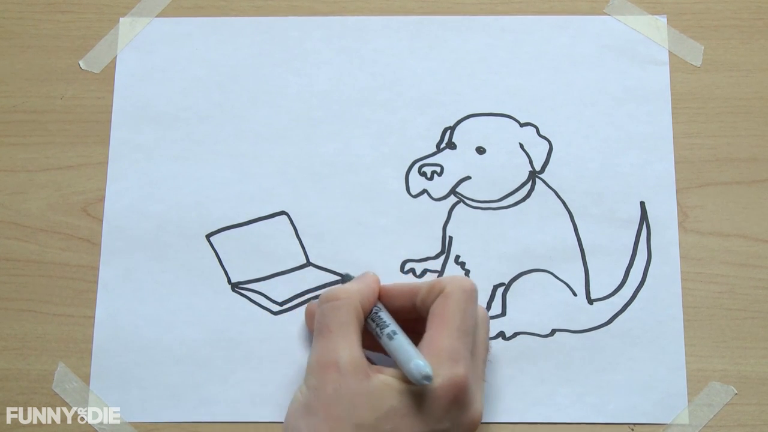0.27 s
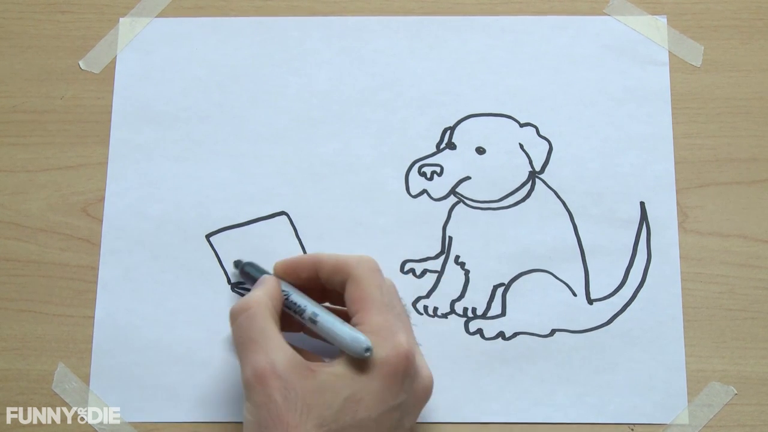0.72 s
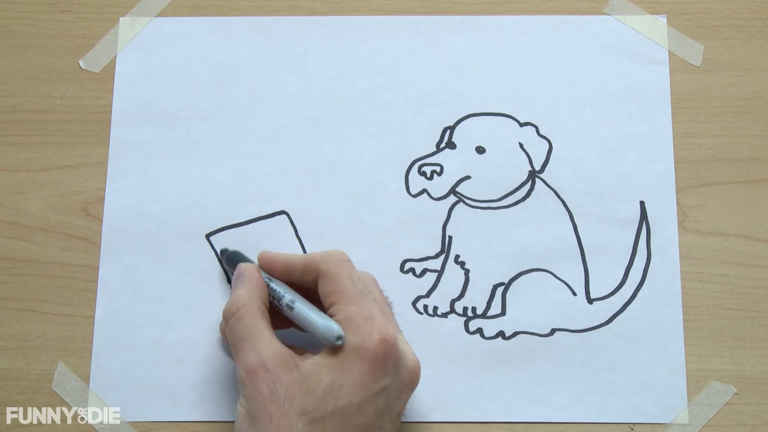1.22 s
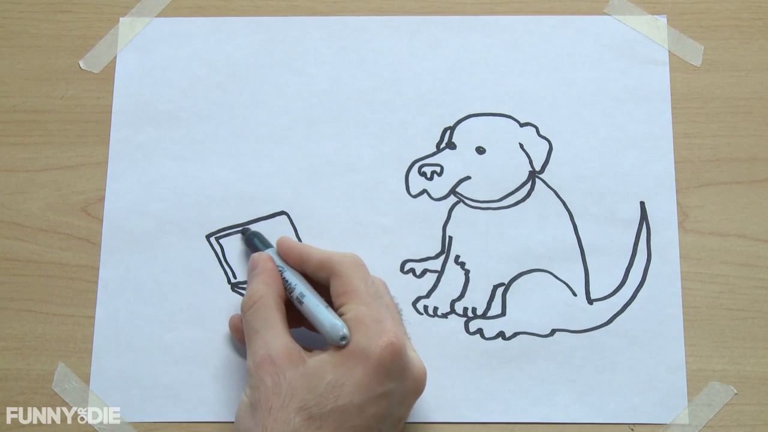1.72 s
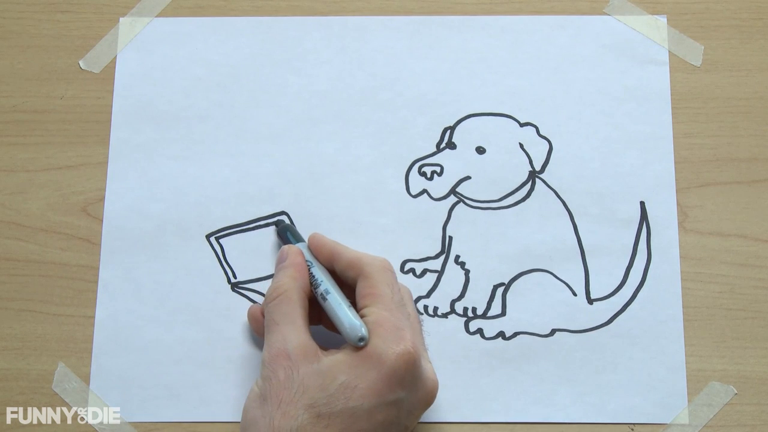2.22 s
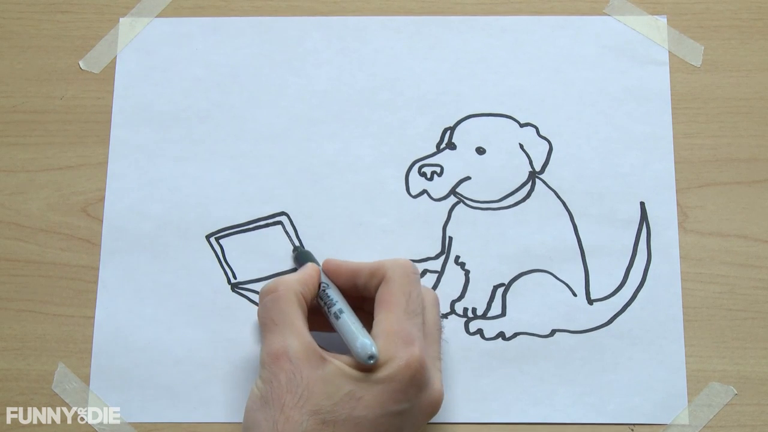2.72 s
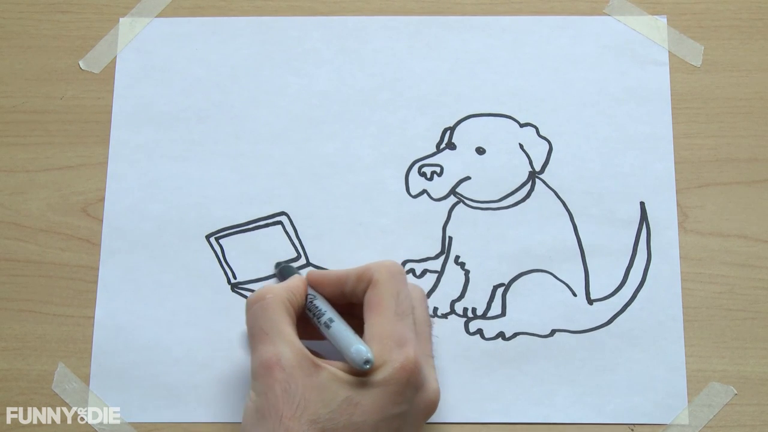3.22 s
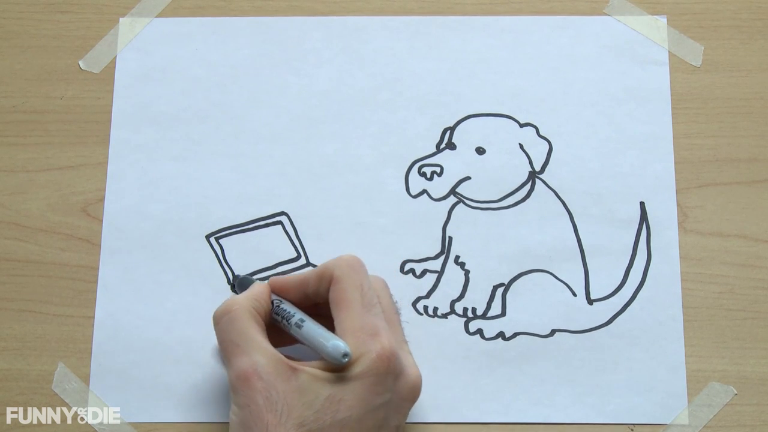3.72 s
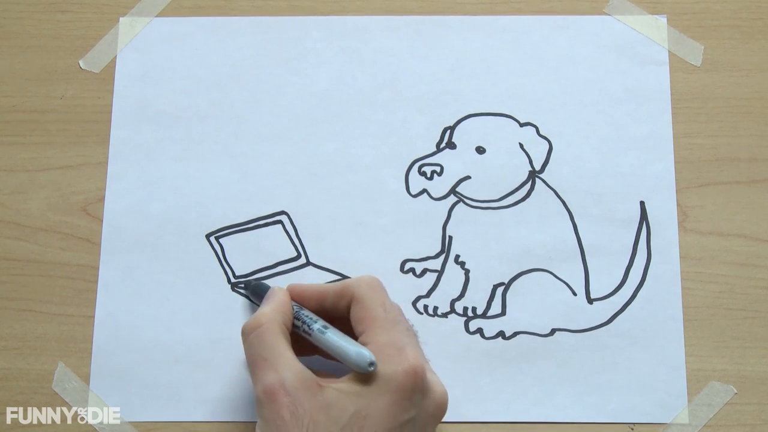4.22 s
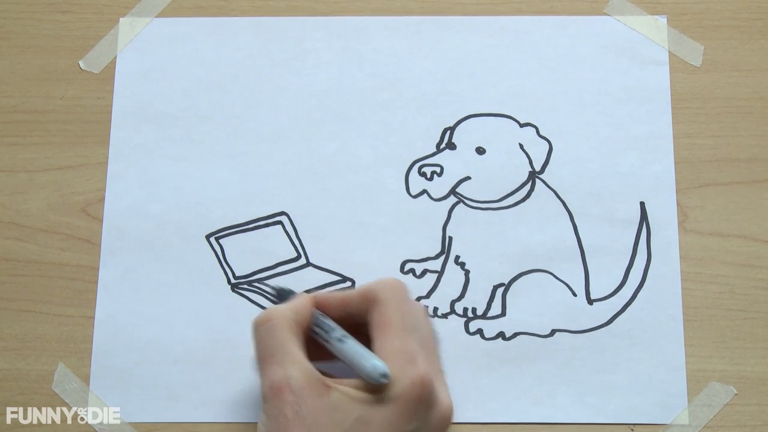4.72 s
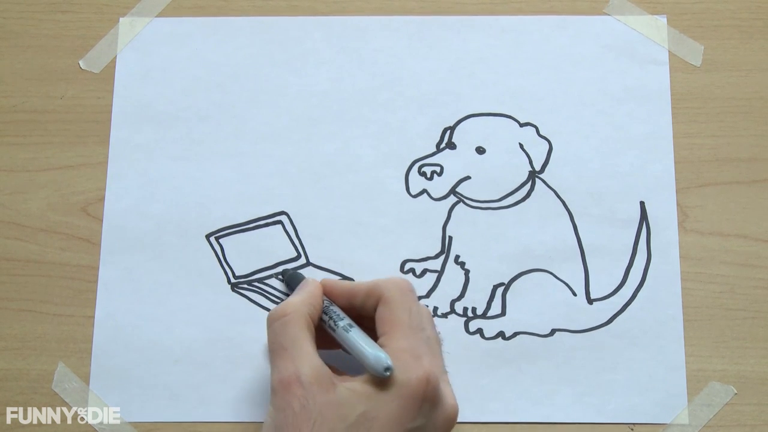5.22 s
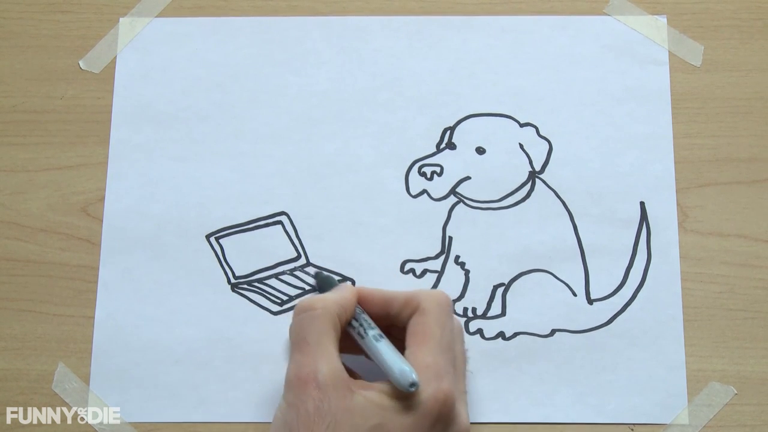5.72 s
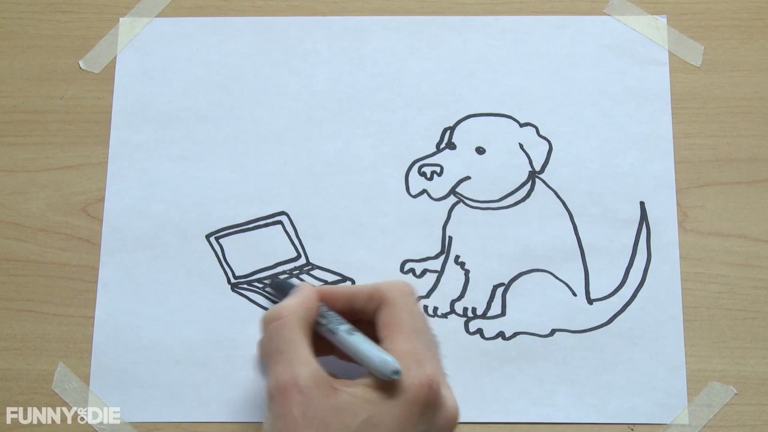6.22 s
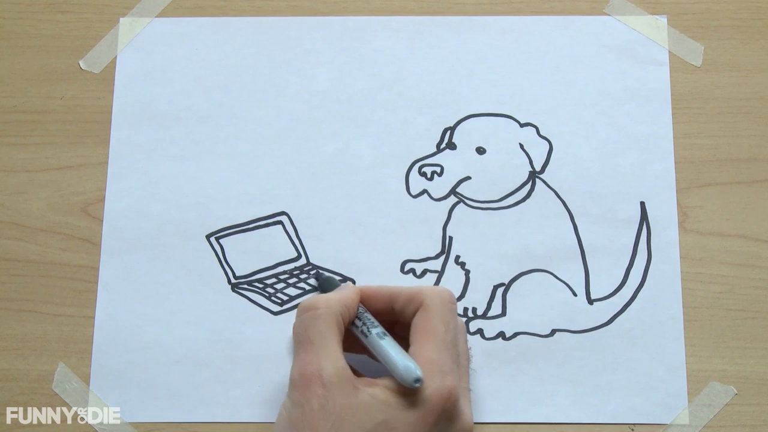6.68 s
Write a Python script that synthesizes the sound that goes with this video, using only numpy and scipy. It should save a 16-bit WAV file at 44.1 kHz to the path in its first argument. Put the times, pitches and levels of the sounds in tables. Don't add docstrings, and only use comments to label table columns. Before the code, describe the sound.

Close, bright marker strokes hiss across paper in a quiet room, pausing, ticking and softly knocking the tabletop, ending in harder swipes.

```python
import sys
import numpy as np
from scipy import signal
from scipy.fft import rfft, irfft, next_fast_len
from scipy.io import wavfile

SR = 44100
rng = np.random.default_rng(int(sys.argv[2]) if len(sys.argv) > 2 else 0)


def master_out(mix):
    frames = np.transpose(np.atleast_2d(mix))
    ceiling = np.clip(frames, -1, 1)
    pcm = np.round(ceiling * 32767).astype(np.int16)
    wavfile.write(sys.argv[1], SR, pcm)


def how_loud(loudness_db):
    steps = np.asarray(loudness_db, float) / 20
    return 10 ** steps


N = 306495
PADDED = next_fast_len(N)
TIME = np.arange(N) / SR
FREQ = np.maximum(np.arange(PADDED // 2 + 1) * SR / PADDED, 1)


def marker():
    # start, landing and hold in seconds, barrel level in dB, the same at the end of the hold.
    hatch = [
        (0.0, 0.0017, 0.054, -56.5, -56),
        (.085, .03, 0.036, -56, -56),
        (.18, 0.028, 0.031, -53.5, -57),
        (.275, .02, .015, -60, -65),
    ]
    down = [
        (1.128, .011, .158, -49, -49.5),
        (1.345, 0.043, 0.066, -52.5, -60),
    ]
    up = [
        (1.635, 0.0056, 0.12, -45.5, -54),
        (1.76, 0.056, 0.053, -52.5, -53.5),
        (1.896, .05, 0.029, -50.5, -53.5),
        (2.02, 0.011, 0.033, -54, -51.5),
        (2.14, .016, .012, -51.5, -58),
        (2.383, 0.02, .008, -61, -60),
    ]
    slow_slant = [
        (2.47, .12, 0.082, -56, -61),
        (2.66, 0.064, 0.027, -57, -60.5),
        (2.78, 0.044, .03, -62, -65),
        (2.87, 0.031, .016, -71, -73),
        (5.86, .1, .014, -69, -69),
    ]
    long_across = [
        (3.05, 0.06, 0.19, -52.5, -46),
    ]
    across = [
        (3.325, 0.055, 0.08, -48, -61),
        (3.41, 0.095, 0.11, -49, -57),
        (3.645, 0.048, 0.073, -53, -58.5),
        (3.93, .005, .12, -65, -73),
    ]
    slant = [
        (4.32, .05, 0.089, -51, -57),
        (4.743, 0.019, 0.076, -51.5, -54),
        (5.035, .019, 0.065, -54, -52.5),
        (5.321, 0.013, 0.071, -51.5, -53),
        (5.59, 0.021, 0.07, -56, -51.5),
    ]
    swipe = [
        (6.064, 0.0054, 0.11, -40.5, -43),
        (6.46, .016, .017, -71, -72),
        (6.497, 0.012, 0.074, -40.5, -39),
        (6.873, 0.02, 0.044, -36.5, -42),
    ]
    # frequency in Hz, level in dB per Hz.
    down_colour, up_colour = [(1500, -11), (2100, -14), (2700, -18), (3650, -11), (7300, -10), (8460, -9.5),
                              (11500, -12), (14400, -4), (15500, -8)], [(1290, -47), (2200, -25), (2700, -18), (4230, -14.5),
                                                   (7480, -13.5), (8530, -3.5), (10600, -7), (11600, -5.5),
                                                   (15500, -6)]
    across_colour, slant_colour = [(1500, -40), (2300, -16), (4500, -13.5), (7200, -12.5), (7600, -4),
                                   (10300, -4.5), (13800, 1), (14800, -10), (15500, -16)], [(1290, -27), (2200, 0.5), (2410, -7.5),
                                                          (3360, -2.5), (4940, 0), (7360, 1), (9960, -4),
                                                          (11200, -2.5), (13700, 9.5), (15500, -1)]
    swipe_colour = [(1290, -51), (2200, -25.5), (4400, -21.5), (4820, -16), (6620, -18), (8120, -7),
                    (10400, -1.5), (11300, -5.5), (13000, -3), (15500, -16)]
    # frequency in Hz, width in Hz, level in dB.
    down_modes, up_modes = [(4730, 170, -8), (6640, 300, 4), (8100, 230, 1.5), (8660, 240, 10),
                            (10240, 680, 0), (12700, 400, 5), (14600, 400, -2)], [(8220, 71, -3), (9180, 85, 3), (10100, 38, -6),
                                                (10100, 170, -13), (10500, 64, -14), (11400, 210, 3),
                                                (14100, 83, -9)]
    across_modes, slant_modes = [(5380, 910, -7.5), (7620, 220, 5), (8290, 1700, -4.5), (8600, 61, -3),
                                 (9540, 150, -8), (9900, 200, 5.5), (10370, 450, 3.5), (11000, 150, -4),
                                 (11000, 180, -6), (11750, 220, 2), (13300, 290, -15)], [(4950, 270, -0.5), (6200, 240, -22), (8030, 210, 1),
                                                       (9900, 870, 11.5), (12700, 400, 1), (12900, 370, -2)]
    swipe_modes = [(4900, 190, -18), (8180, 160, 5), (8800, 150, -6), (10130, 180, 4), (10650, 230, -5),
                   (11600, 150, -9), (11800, 180, -6), (12800, 270, 4)]
    # lift-off in dB per s, arch in dB per s of hold, paper in dB, paper leads in dB per dB (negative: it
    # lags), paper lingers 0-1, tip in dB, tip brightens by dB. The last number of a pull lifts the modes in dB.
    pulls = [
        (down, (250, 11, -4, 0.1, 0.2, -7.5, 0.1), down_colour, down_modes, 4),
        (up, (500, 15, -8, -0.14, 0.12, -2, -6), up_colour, up_modes, 5),
        (across, (350, 1, -8.5, 0.2, 0.4, -8, 4.5), across_colour, across_modes, 5),
        (hatch, (400, 10, -8, -0.06, 0.38, -6, 2), across_colour, across_modes, 5),
        (long_across, (350, 6, -10.5, 0.66, 0.3, -19, 11), across_colour, across_modes, 5),
        (slow_slant, (500, 6, -4.5, 0.08, 0.31, -6, -3), slant_colour, slant_modes, 3),
        (slant, (600, 32, -4.5, 0, 0.47, -1.5, 0), slant_colour, slant_modes, 3),
        (swipe, (552, 43, -11.5, 0.1, 0.87, -6, 3.5), swipe_colour, swipe_modes, 4),
    ]
    rub = rfft(slips(per_s=9000, spread_db=-0.5, smooth=1.0), PADDED)
    flutter_db = 0.94 * drift(7.5) + 0.4 * drift(150)
    direct = sum(strokes(*pull, rub) for pull in pulls) * how_loud(flutter_db) + ticks()
    echoes = dying_noise(level_db=-38.5, t60=0.41, start_s=0.02)
    walls = signal.lfilter(*signal.butter(2, 6500, fs=SR), echoes)
    return direct + signal.fftconvolve(direct, walls)[:N]


def strokes(rows, touch, points, modes, lift_db, rub):
    paper_gives, mean_db = 0.29, -53.5
    heard = rub * colour(points, modes, lift_db)
    paper = band(heard, 1500, 6730)
    barrel = band(heard, 7250, 11150)
    tip = band(heard, 11320, 17500)
    lift_db_per_s, arch_db_per_s, paper_db, leads, lingers, tip_db, brightens_db = touch
    out = np.zeros(N)
    for start_s, *shape in rows:
        first = round(start_s * SR)
        barrel_db = pressure(*shape, lift_db_per_s, arch_db_per_s)[:N - first]
        length = len(barrel_db)
        span = slice(first, first + length)
        peak_db, so_far_db = barrel_db.max(), np.maximum.accumulate(barrel_db)
        let_go_db = np.minimum(so_far_db - barrel_db, 18)
        landing_db = np.minimum(peak_db - so_far_db, 12)
        on_paper_db = paper_db + lingers * let_go_db + leads * landing_db - paper_gives * (peak_db - mean_db)
        on_tip_db = tip_db + brightens_db * np.minimum(np.linspace(0, 2, length), 1)
        stroke = barrel[span] + how_loud(on_paper_db) * paper[span] + how_loud(on_tip_db) * tip[span]
        stroke *= signal.windows.tukey(length, 200 / length) * how_loud(barrel_db)
        sheet = dying_noise(level_db=-27, t60=0.045, start_s=0.0012)[:2500]
        sheet[0] = 1
        sheet_sound = signal.fftconvolve(stroke, sheet / np.sqrt(np.sum(sheet ** 2)))
        out[first:][:len(sheet_sound)] += sheet_sound[:N - first]
    return out


def pressure(attack_s, hold_s, db, end_db, lift_db_per_s, arch_db_per_s):
    landing_db, lifted_db = 19, 34
    lift_s = attack_s + hold_s
    end_s = lift_s + lifted_db / lift_db_per_s
    age = TIME[:round(end_s * SR)]
    arch_db = arch_db_per_s * hold_s * np.sin(np.pi * np.clip((age - attack_s) / hold_s, 0, 1))
    levels_db = [db - landing_db, db, end_db, end_db - lifted_db]
    return arch_db + np.interp(age, [0, attack_s, lift_s, end_s], levels_db)


def slips(per_s, spread_db, smooth):
    sizes = how_loud(spread_db * np.minimum(rng.exponential(1, N), 4)) * rng.choice([-1, 1], N)
    clicks = sizes * (rng.random(N) < per_s / SR)
    return rms_one(clicks) + smooth * rng.standard_normal(N)


def ticks():
    # time in seconds, peak in dB, frequency in Hz, decay in seconds.
    landings = [(.4085, -48, 8400, .001), (.4369, -43, 11000, .001), (.58, -38, 8600, .0015),
                (.5884, -52, 4600, .001), (3.922, -39.5, 9500, 0.0025), (3.925, -41, 5000, 0.0024),
                (4.292, -47, 10000, .003), (4.5136, -43, 9500, .001), (5.002, -38, 9900, 0.0014),
                (5.007, -40, 11000, .002), (5.2854, -36.5, 10500, .0012), (5.2914, -42, 9760, .0012),
                (5.5653, -40.5, 8400, .0012), (6.8598, -40, 11000, 0.0013)]
    out, length = np.zeros(N), 900
    age = TIME[:length]
    for s, db, hz, decay_s in landings:
        burst = rng.standard_normal(length) * age * np.exp(-age / decay_s)
        tip_band = signal.butter(1, [0.83 * hz, 1.2 * hz], "band", fs=SR, output="sos")
        burst = signal.sosfilt(tip_band, burst)
        out[round(s * SR):][:length] += how_loud(db - 5.5) * burst / np.abs(burst).max()
    return out


def knocks():
    # time in seconds, peak in dB.
    hits = [
        (1.14, -47.5),
        (4.711, -53),
        (5.002, -39.5),
        (5.284, -37),
        (5.567, -34.5),
        (6.428, -47),
        (6.856, -46.5),
    ]
    # frequency in Hz, level in dB, t60 in seconds.
    table_modes = [(370.6, -2.5, 0.18), (428, 8.5, 0.038), (478, -12.5, 0.27), (790, -23, 0.033)]
    blows = np.zeros(N)
    for s, db in hits:
        blows[round(s * SR)] = how_loud(db - 0.5)
    age = TIME[:SR // 2]
    ring = sum(how_loud(db - 60 * age / t60) * np.sin(2 * np.pi * hz * age) for hz, db, t60 in table_modes)
    ring *= 1 - np.exp(-age / 0.0012)
    wall_band = signal.butter(3, [320, 950], "band", fs=SR, output="sos")
    walls = signal.sosfilt(wall_band, dying_noise(level_db=3, t60=0.56, start_s=0.0093))
    panel_band = signal.butter(2, [340, 560], "band", fs=SR, output="sos")
    panel = signal.sosfilt(panel_band, dying_noise(level_db=9.5, t60=0.36, start_s=0.0075))
    return signal.fftconvolve(blows, ring + walls + panel)[:N]


def hand():
    # frequency in Hz, level in dB per Hz.
    skin_colour = [(400, -27), (600, -5.5), (830, 4), (1130, -1.5), (1320, 1), (1600, 2), (1780, -4),
                   (1880, -32), (2600, -37)]
    # middle and length in seconds, level in dB.
    slides = [(.0, 0.088, -49), (.18, 0.37, -53.5), (1.17, 0.053, -53), (1.26, 0.17, -49),
              (1.42, 0.22, -51.5), (1.9, 0.64, -56.5), (2.3, 0.18, -56.5), (2.6, 0.35, -53.5),
              (2.95, 0.27, -57.5), (3.2, 0.13, -47.5), (3.32, .2, -50), (3.53, 0.42, -51), (3.8, 0.15, -50),
              (3.98, .12, -54), (4.35, 0.21, -56.5), (5.35, 0.17, -62), (5.66, 0.15, -59),
              (6.16, 0.091, -55), (6.92, .1, -56)]
    rub = rfft(slips(per_s=3000, spread_db=4.0, smooth=3.0), PADDED) * colour(skin_colour)
    return how_loud(-3.5) * swells(slides, rest_db=-59) * band(rub, 335, 2100)


def room_tone():
    # frequency in Hz, level in dB per Hz.
    air_colour = [(18, -15), (50, -15), (100, -7), (140, -8), (250, -8.5), (304, -22.5), (500, -29),
                  (560, -30), (1600, -38.5), (1900, -40.5), (2600, -45.5), (7850, -48), (15500, -50.5)]
    # frequency in Hz, width in Hz, level in dB.
    air_modes = [(35.2, 13.8, 16), (69.4, 5.8, 5), (92.2, 5, 9), (116.8, 6.2, 4.5), (175.8, 15.4, 10),
                 (205.6, 16.3, 4), (232.7, 14.4, 1.5), (358, 30, 3.5), (483, 37, -11)]
    # time in seconds, level in dB.
    draught = [(0.0, -38), (0.13, -38.5), (0.31, -46), (0.44, -41.5), (0.68, -46), (1.33, -37),
               (1.53, -42.5), (1.92, -36.5), (1.95, -41), (3.33, -31), (3.41, -38), (5.05, -42),
               (5.07, -38), (6.31, -42.5), (6.39, -49), (6.48, -37), (6.85, -46.5), (6.95, -39)]
    # middle and length in seconds, level in dB.
    second_gusts = [(.09, 0.16, -38), (1.1, 0.54, -39.5), (1.8, .35, -35), (2.27, 0.38, -39),
                    (2.65, 0.82, -40.5), (3.45, 0.44, -43), (4.0, 0.62, -40.5), (5.17, 0.23, -42),
                    (6.05, .3, -42.5), (6.6, 0.38, -45.5)]
    rumble_gusts = [
        (.27, .3, -46.5),
        (.8, 0.53, -53),
        (2.2, 0.18, -47),
        (3.33, 0.44, -49),
        (5.17, 0.098, -52.5),
    ]
    drone_gusts = [(.1, 0.14, -46), (.82, 0.36, -49.5), (1.75, 0.51, -49), (2.4, 0.31, -47),
                   (2.8, 0.53, -44), (4.1, 0.52, -49), (4.55, .35, -47), (5.0, .15, -51.5), (5.65, .3, -49)]
    air = rfft(rng.standard_normal(PADDED)) * colour(air_colour, air_modes, sign=0.98)
    lowest = 0.8 * standing_wave(35.84, wander_hz=1.8) + 0.55 * band(air, 22, 56)
    second = 0.51 * standing_wave(72.15, wander_hz=2.51) + 0.17 * band(air, 68.5, 60.4)
    low = how_loud(np.interp(TIME, *np.transpose(draught))) * lowest
    low += swells(second_gusts, rest_db=-51.5) * second
    low += swells(rumble_gusts, rest_db=-47) * band(air, 66.0, 127)
    low += swells(drone_gusts, rest_db=-50) * band(air, 141.4, 274)
    return low + how_loud(-54) * band(air, 304.0, 19000)


def fan():
    # frequency in Hz, level in dB.
    harmonics = [(813, -73.5), (942, -78), (1060, -70.5), (1221, -81), (1315, -76), (1628, -67.5),
                 (1831.5, -73), (2035, -69.5), (2238.5, -88)]
    # frequency in Hz, width in Hz, level in dB.
    whistle = [(8370, 76, -78.5), (8450, 24, -76)]
    out = np.zeros(N)
    for hz, db in harmonics:
        out += np.sqrt(2) * how_loud(db) * np.sin(2 * np.pi * (hz * TIME + rng.random()))
    out *= how_loud(0.44 * drift(3.6))
    white = rfft(rng.standard_normal(PADDED))
    for hz, width_hz, db in whistle:
        out += how_loud(db) * back_in_time(white / (1 + (2 * (FREQ - hz) / width_hz) ** 2))
    return out


def standing_wave(hz, wander_hz):
    return np.sqrt(2) * np.sin(2 * np.pi * np.cumsum(hz + wander_hz * drift(3.15)) / SR)


def swells(rows, rest_db):
    power = np.full(N, how_loud(2 * rest_db))
    for middle_s, length_s, db in rows:
        away = np.abs(TIME - middle_s) / (length_s / 2)
        power += how_loud(2 * db) * np.clip(1.5 - away, 0, 1) ** 2
    return np.sqrt(power)


def dying_noise(level_db, t60, start_s):
    age = TIME[:SR // 2]
    return rng.standard_normal(len(age)) * how_loud(level_db - 60 * age / t60) * (age > start_s)


def colour(points, modes=(), lift_db=0, sign=-1):
    hz, level_db = np.transpose(points)
    smooth = how_loud(np.interp(np.log(FREQ), np.log(hz), level_db))
    rings = 0
    for k, (centre_hz, width_hz, db) in enumerate(modes):
        rings = rings + sign ** k * how_loud(db + lift_db) / (1 + 2j * (FREQ - centre_hz) / width_hz)
    return smooth * (1 + rings)


def band(spectrum, low_hz, high_hz):
    edges = (1 + (low_hz / FREQ) ** 24) * (1 + (FREQ / high_hz) ** 24)
    return back_in_time(spectrum / np.sqrt(edges))


def drift(rate_hz):
    return back_in_time(rfft(rng.standard_normal(PADDED)) / (1 + (FREQ / rate_hz) ** 2))


def back_in_time(spectrum):
    return rms_one(irfft(spectrum, PADDED)[:N])


def rms_one(x):
    return x / np.sqrt(np.mean(x ** 2) + 1e-20)


def scene():
    return (marker() + knocks() + hand() + room_tone() + fan())[None]


def low_pass(x):
    return signal.sosfilt(signal.butter(12, 15620, fs=SR, output="sos"), x)


def record(dry):
    fade_db = np.interp(FREQ - 15300, [0, 250, 700], [0, -30, -55])
    mix = irfft(rfft(dry, PADDED) * how_loud(fade_db), PADDED)[:, :N]
    return low_pass(mix)


dry = scene()
out = record(dry)
master_out(out)
```